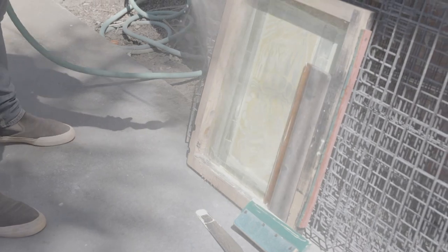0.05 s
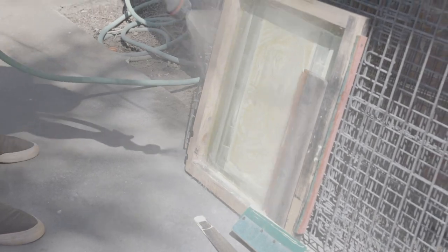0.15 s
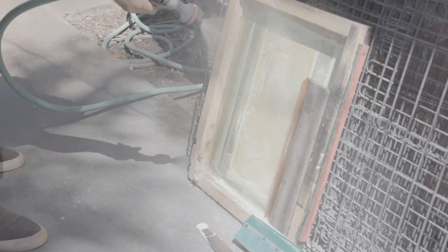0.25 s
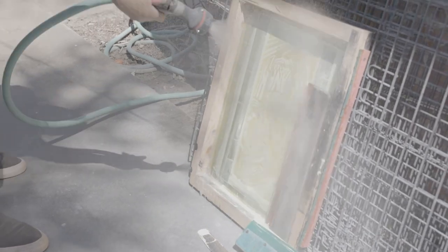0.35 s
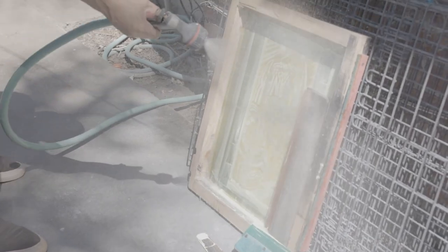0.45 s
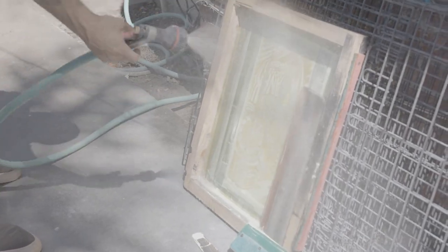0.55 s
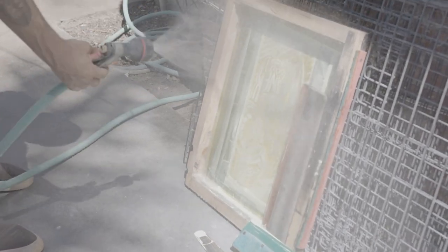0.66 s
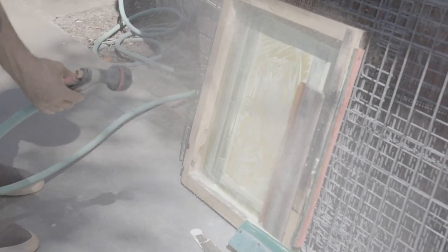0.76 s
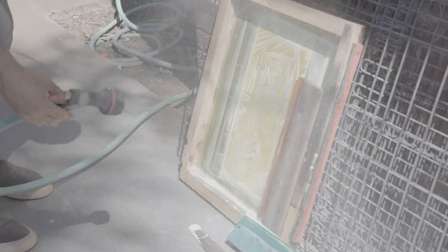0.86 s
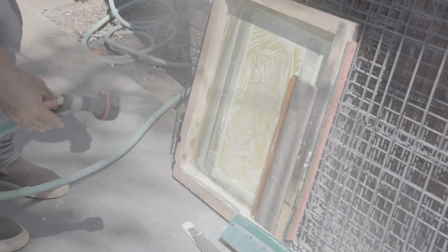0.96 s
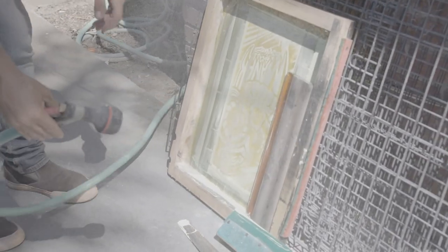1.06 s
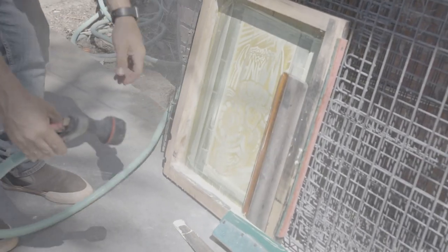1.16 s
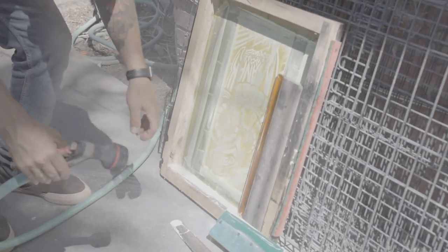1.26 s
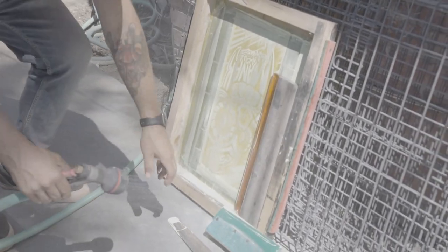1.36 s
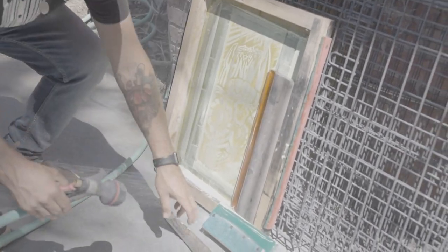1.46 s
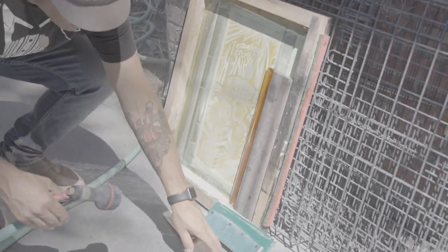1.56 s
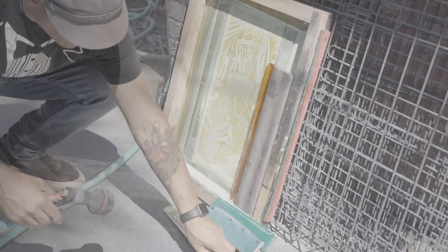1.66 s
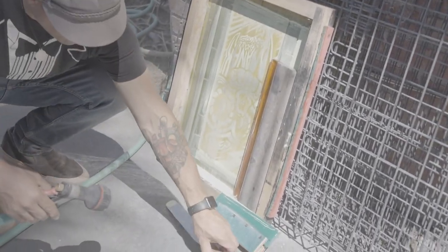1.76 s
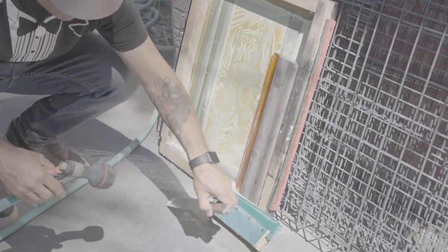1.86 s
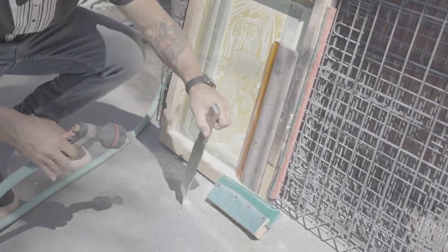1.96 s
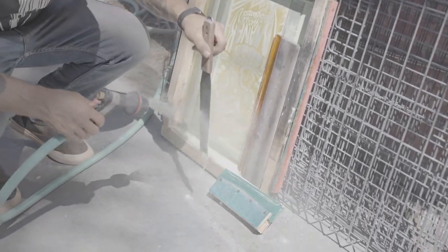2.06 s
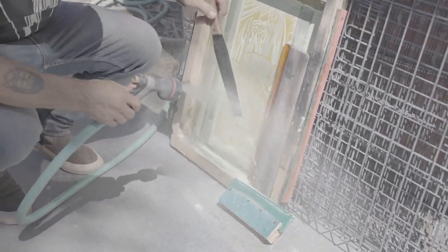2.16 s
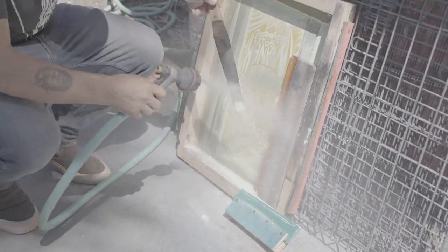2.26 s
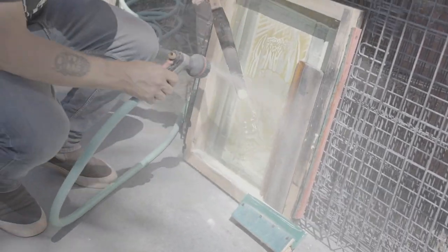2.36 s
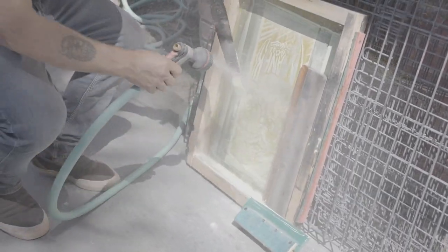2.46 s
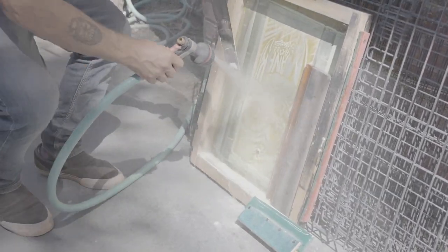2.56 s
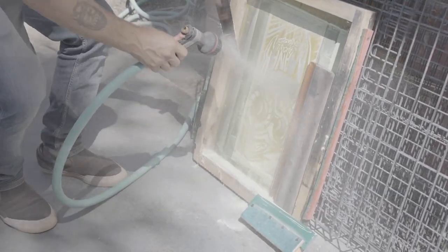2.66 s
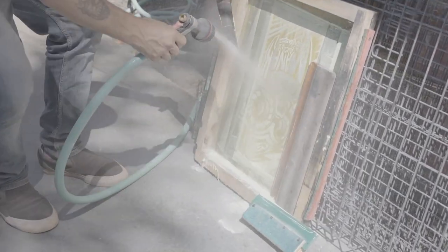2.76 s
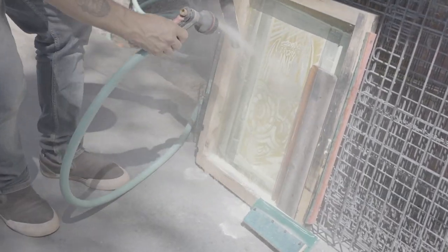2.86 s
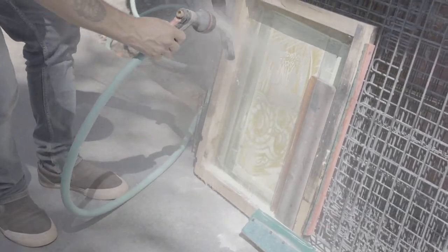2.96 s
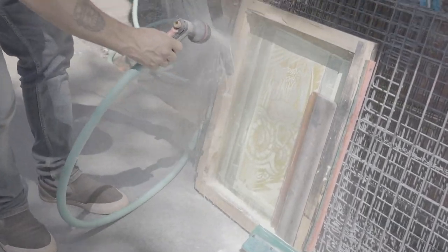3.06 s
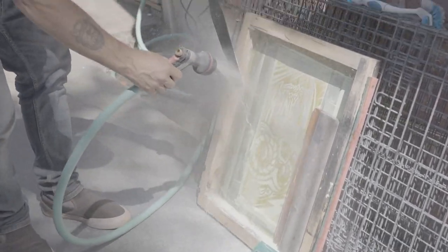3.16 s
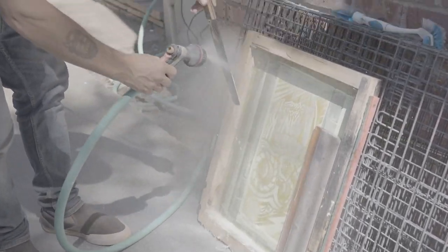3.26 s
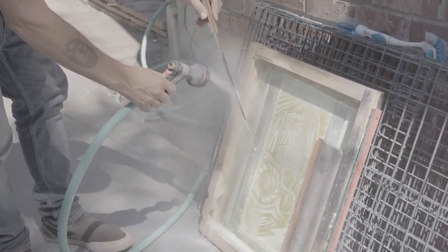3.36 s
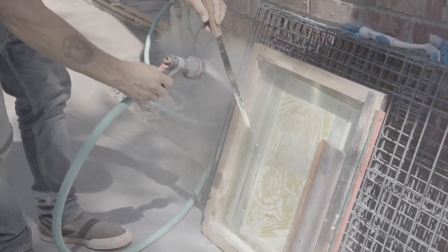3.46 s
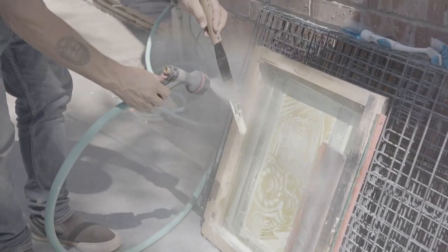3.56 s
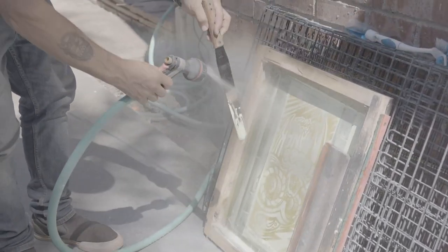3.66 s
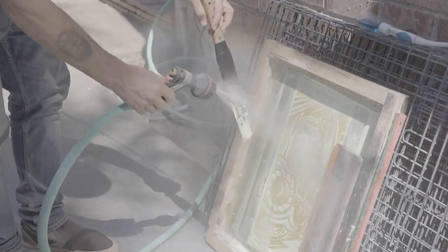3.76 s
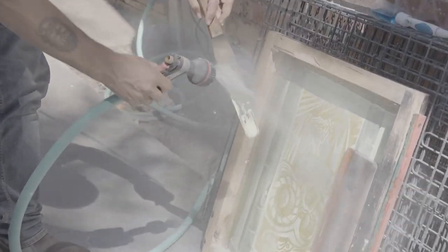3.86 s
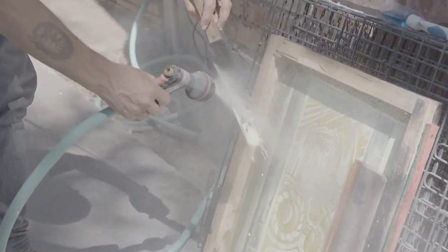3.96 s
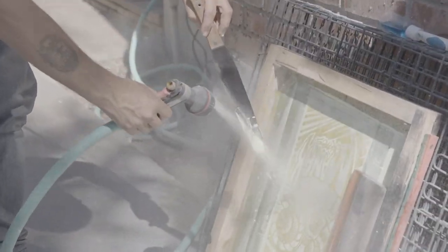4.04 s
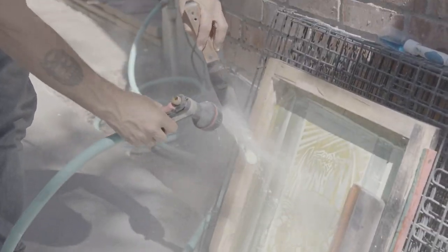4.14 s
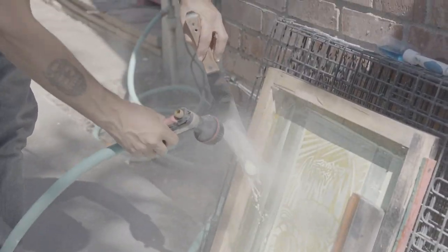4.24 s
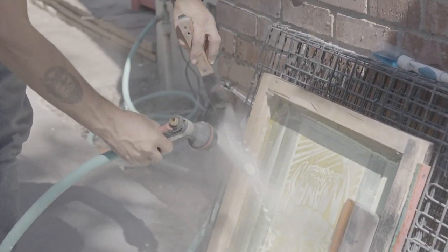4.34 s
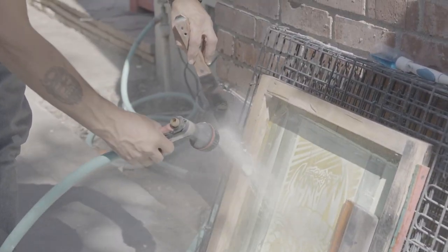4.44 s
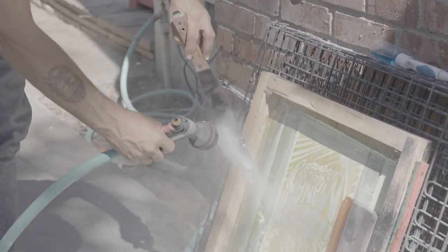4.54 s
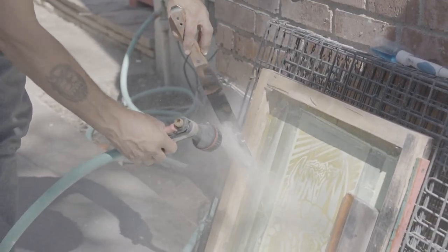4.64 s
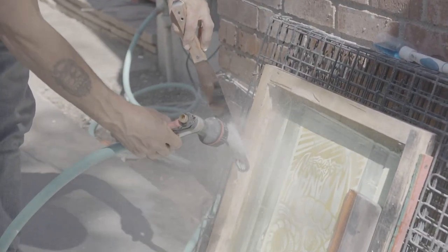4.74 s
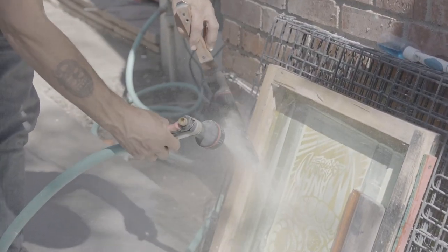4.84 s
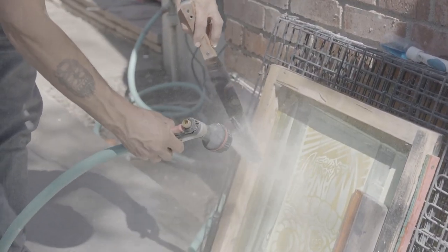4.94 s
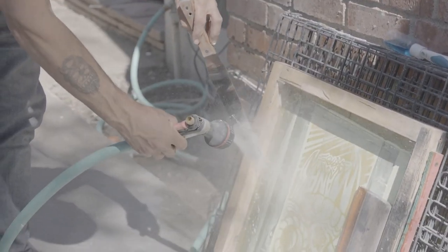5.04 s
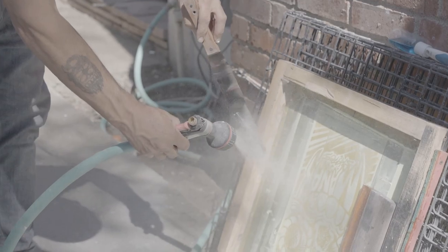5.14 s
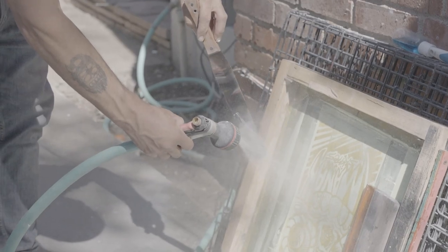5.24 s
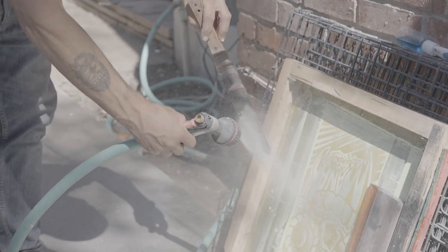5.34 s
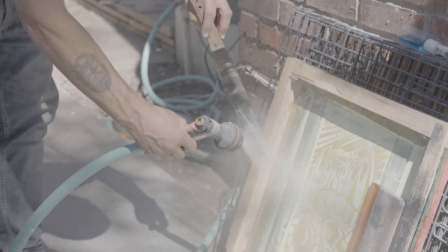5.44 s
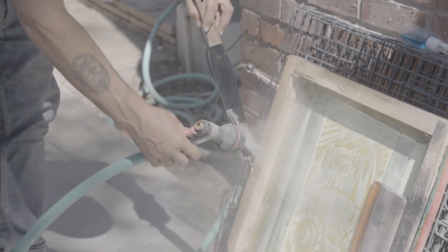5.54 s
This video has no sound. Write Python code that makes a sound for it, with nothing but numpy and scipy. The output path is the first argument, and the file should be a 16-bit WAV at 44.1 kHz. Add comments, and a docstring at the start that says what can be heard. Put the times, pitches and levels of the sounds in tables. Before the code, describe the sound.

Close outdoor stereo sound of a hose jet hissing, splashing and drumming on a taut framed screen. It cuts off sharply; in the quiet pause shoes scuff concrete, the shut valve whistles faintly and very high, and a steel scraper rasps and rings as it is picked up. The spray then returns abruptly, passes over the blade and continues in uneven surges to the end.

```python
"""A garden hose sprays a framed mesh screen in a yard: the jet hisses, splashes, and its drops drum on the taut mesh.
The spray layers are random showers of impacts, coloured as mist and splash or rung through mesh and frame modes.
The trigger is let go for 1.2 s: shoes scuff, the shut valve whistles thinly (wandering sine lines and narrow
noise), and a steel scraper rasps and rings as it is picked off the concrete. Then the spray runs on, over the
scraper's blade and the screen. Shaped noise makes the faint yard air and the runoff."""
import sys
import numpy as np
from scipy import signal
from scipy.fft import rfft, irfft, next_fast_len
from scipy.io import wavfile
from scipy.ndimage import map_coordinates

SR = 44100
rng = np.random.default_rng(int(sys.argv[2]) if len(sys.argv) > 2 else 0)


def waveform_to_disk(signal):
    """Save audio, clipped to [-1, 1], as 16-bit WAV at the path in sys.argv[1]."""
    frames = np.transpose(np.atleast_2d(signal))
    scaled = np.clip(frames, -1, 1) * 32767
    samples = np.round(scaled).astype(np.int16)
    wavfile.write(sys.argv[1], SR, samples)


N = 246959  # samples, 5.6 s

# Spectra of the fine mist and of the larger splashing drops: (f/Hz, relative level/dB per Hz)
MIST_SPECTRUM = [(900, -36.5), (2200, -9.5), (3300, -6), (4200, -2), (5600, 0.5), (7000, 0), (9000, 0.2),
                 (10600, -3), (13200, -0.5), (15800, -3.5)]
SPLASH_SPECTRUM = [(600, -35.5), (1000, -7), (1300, -5), (1700, -2), (2000, -0.5), (2400, -1), (3000, -3),
                   (3700, -5.5), (6000, -35)]
# Resonances of the wet screen, low and high, and of its wooden frame: (f/Hz, width/Hz, relative level/dB)
MESH_LOW_MODES = [(237, 33, 0), (324, 60, -3.5), (430, 77, -3.5)]
MESH_HIGH_MODES = [(457, 37, -10.5), (633, 76, -1), (777, 80, -.5), (892.5, 42, 0), (1147, 81, -7)]
FRAME_MODES = [(112, 17, 7), (137, 61, -12)]
# Slow change of the jet's force on the screen as the hand moves: (t/s, level/dB)
REACH_CURVE = [(0, 0.96), (0.85, 0.5), (2.1, -0.5), (2.3, 0.73), (3.6, 0.55), (4.5, -0.63), (4.9, -1.5),
               (5.6, 0)]
# The jet sweeps squarely over the taut mesh, or slips off it: (middle t/s, length/s, force level/dB)
SWEEP_ROWS = [(0.16, 0.077, 5.5), (0.314, 0.101, 2), (0.455, 0.079, 3), (0.641, 0.056, 2),
              (2.683, 0.127, 3), (2.835, 0.045, 4), (3.08, 0.026, 6), (3.259, 0.081, 3.5),
              (3.538, 0.19, 5.8), (3.759, 0.12, 6), (4.158, 0.079, 9.5), (4.308, 0.127, 5),
              (4.672, 0.034, 8), (4.802, 0.075, 11), (5.039, 0.07, 7.0), (5.302, 0.24, 4.5),
              (5.568, 0.072, 7)]
SLIP_ROWS = [(0.381, 0.03, -4.5), (0.553, 0.07, -2), (3.156, 0.054, -5.1), (3.361, 0.047, -4.5),
             (4.079, 0.043, -2.5), (4.202, 0.037, -4), (4.466, 0.12, -2.5), (4.624, 0.054, -3),
             (4.873, 0.069, -4.0)]
# How each layer answers the jet: (base level/dB, share of a sweep's dB, share of a slip's dB)
MIST_RESPONSE = (-18.5, 0.23, 0.73)
SPLASH_RESPONSE = (-25, 0.38, 1.12)
DRUM_RESPONSE = (-34.5, 1.0, 1.0)
SWAY_RESPONSE = (-39.5, 0.7, 0.8)
# The scraper's blade crosses the jet and shields the screen: (start t/s, end t/s, splash level/dB)
BLADE_SHIELD = (2.14, 2.32, -4)
BOOM_DB, BOOM_DB_PER_S = -62.5, 1  # the frame's boom grows as the nozzle comes closer


def spray():
    """Fine mist hisses, larger drops splash, and the heaviest drum on the mesh and shake its frame."""
    flow, fan, leak = trigger()
    reach_db, = curves(REACH_CURVE)
    sweep_db, slip_db = swells(SWEEP_ROWS), swells(SLIP_ROWS)

    def layer_gain(response):
        """The jet's force, as one layer answers it."""
        base_db, sweep_share, slip_share = response
        return amp(base_db + reach_db + sweep_share * sweep_db + slip_share * slip_db)

    shield_start, shield_end, shield_db = BLADE_SHIELD
    shield_gain = amp(shield_db * gate(shield_start, shield_end, fade=.035))
    boom_gain = amp(BOOM_DB + BOOM_DB_PER_S * clock())

    mist_drops = patchy(drops(40000, spread_db=2), depth_db=1.2, width_hz=250, life=.2)
    mist = coloured(mist_drops, MIST_SPECTRUM)
    splash_drops = patchy(drops(12000, spread_db=2.5), depth_db=2.34, width_hz=110.6, life=0.2177)
    splash = coloured(walls(splash_drops), SPLASH_SPECTRUM)
    drum = resonate(drops(4000, spread_db=3), MESH_HIGH_MODES)
    sway = resonate(drops(2500, spread_db=2.5), MESH_LOW_MODES)
    boom = resonate(drops(2500, spread_db=3.0), FRAME_MODES)

    flutter = wobble(45)  # the jet breaks into slugs
    treble = (fan * layer_gain(MIST_RESPONSE) + leak) * mist
    treble = treble + flow * layer_gain(SPLASH_RESPONSE) * shield_gain * splash
    bass = layer_gain(DRUM_RESPONSE) * drum + layer_gain(SWAY_RESPONSE) * sway + boom_gain * boom
    return treble * amp(.4 * flutter) + flow * bass * amp(1.06 * flutter)


# The trigger is held: (valve opens t/s, valve shuts t/s)
TRIGGER_HOLDS = [(-.5, 0.8893), (2.089, 6)]
OPEN_S, SHUT_DB_PER_S = .004, 362  # the jet arrives at once and dies away as the valve closes
FAN_DB, FAN_S = -3.5, 0.085  # the mist starts this much weaker; time constant of its fanning out
LEAK_DB, LEAK_DB_PER_S = -34, 400  # hiss as the valve cracks open, and how fast it builds


def trigger():
    """Gains of the jet's flow, of its mist as it fans out, and of the leak just before it starts."""
    t = clock()
    flow, fan, leak = np.zeros((3, N))
    for opens, shuts in TRIGGER_HOLDS:
        attack = np.clip(1 + (t - opens) / OPEN_S, 0, 1)
        held = attack * amp(-SHUT_DB_PER_S * np.maximum(t - shuts, 0))
        flow += held
        fan += held * amp(FAN_DB * np.exp(-np.maximum(t - opens, 0) / FAN_S))
        leak += (t < opens) * amp(LEAK_DB - LEAK_DB_PER_S * np.abs(opens - t))
    return flow, fan, leak


def swells(rows):
    """Sum of rounded, flat-topped bumps in dB; each length is the width at half the bump's dB."""
    t = clock()
    return sum(db / (1 + (2 * (t - middle) / length) ** 4) for middle, length, db in rows)


# Early echoes from the ground and brick walls: (delay t/s, level/dB)
WALL_ECHOES = [(.0031, -21.5), (0.011, -14.5), (0.0197, -17), (0.025, -18)]


def walls(x):
    """Early echoes comb the sound; their paths drift as the hand moves."""
    t = clock()
    out = x.copy()
    for delay, db in WALL_ECHOES:
        heard = t - delay - .00005 * wobble(1.5)
        out += amp(db) * np.array([np.interp(heard, t, channel) for channel in x])
    return out


# The jet dwells on a spot and makes it ring: (start t/s, end t/s, f/Hz, width of each filter pass/Hz, level/dB)
RINGING_SPOTS = [(0.384, .85, 1125, 40, -34), (.42, .85, 1295, 110, -36), (0.299, 0.8, 2230, 200, -33.5),
                 (.78, 0.912, 1810, 350, -28), (2.05, 2.283, 1473, 230, -28), (2.14, 2.343, 2720, 400, -25),
                 (2.17, 2.33, 3850, 400, -30), (2.25, 2.657, 1490, 220, -31.5),
                 (2.16, 2.27, 236, 60, -34.5), (2.38, 2.9, 1920, 160, -33),
                 (2.498, 2.951, 3050, 240, -34.5), (4.329, 4.76, 6060, 59.9, -33),
                 (4.72, 5.049, 6130, 80, -36), (5.1, 5.7, 1540, 160, -32), (4.45, 5.7, 1910, 320, -36.5),
                 (4.95, 5.697, 2940, 260, -33)]


def spots():
    """Frame, mesh and blade ring in narrow bands of noise that swell and fade as the jet dwells on them."""
    out = np.zeros((2, N))
    for start, end, hz, width, db in RINGING_SPOTS:
        across = np.clip((clock() - start) / (end - start), 0, 1)
        arch = 2 * np.sqrt(across * (1 - across))
        band = signal.iirpeak(hz, hz / width, fs=SR)
        once = signal.lfilter(*band, rng.standard_normal((2, N)))
        ring = signal.lfilter(*band, once)
        out += amp(db) * arch * unit(ring)
    flow, _, _ = trigger()
    return out * flow


# Spectrum of grit crushed on concrete: (f/Hz, relative level/dB per Hz); it also colours the yard's runoff
GRIT_SPECTRUM = [(900, -33), (1900, 1), (3200, -7), (5500, 0.5), (8500, 0), (11000, -3.5), (15000, -5)]
# The blade pressed on the ground: (f/Hz, width/Hz, relative level/dB)
RASP_MODES = [(1860, 300, -1), (5300, 450, 1), (6100, 200, 1), (7950, 500, 1), (8750, 700, -1)]
# The scraper is dragged off the ground: (loudest t/s, pressure level/dB, rise/dB per s, fall/dB per s)
DRAG_STROKES = [(1.9, -43, 430, 260), (1.934, -48.5, 900, 200)]
# Its edge catches: (t/s, level/dB)
EDGE_CATCHES = [(1.898, -44), (1.931, -36), (1.936, -37)]
# The free blade: (f/Hz, level/dB, t60/s)
BLADE_MODES = [(3560, -66, .3), (4727, -50, .3), (12370, -54, .2), (13660, -67, .17)]


def scraper():
    """The steel edge rasps over concrete, catches, and rings on after the last catch as it lifts."""
    grit = coloured(drops(3000, spread_db=1), GRIT_SPECTRUM)
    steel = resonate(drops(3000, spread_db=4), RASP_MODES)
    t = clock()
    strokes = [amp(db - np.maximum(rise * (s - t), fall * (t - s))) for s, db, rise, fall in DRAG_STROKES]
    pressure = np.max(strokes, axis=0)
    out = pressure * (amp(-2) * grit + amp(-4) * steel)
    crack = coloured(rng.standard_normal((2, N)), GRIT_SPECTRUM)
    for s, db in EDGE_CATCHES:
        age = np.maximum(t - s, 0)
        out += amp(db) * (age > 0) * amp(-60 * age / .016) * crack
    free = np.maximum(t - EDGE_CATCHES[-1][0], 0)
    for hz, db, t60 in BLADE_MODES:
        out[0] += amp(db - 60 * free / t60) * np.sin(2 * np.pi * hz * free)
    return out


# A rubber sole on wet concrete: (f/Hz, relative level/dB per Hz)
SOLE_SPECTRUM = [(100, -10), (300, 5), (600, -6), (1000, -6), (2400, -4), (4000, -18), (8000, -11),
                 (14000, -32)]
# Shoes and grit on the concrete: (t/s, level/dB, time to fall 40 dB/s, centre f/Hz)
SCUFF_EVENTS = [(1.125, -44, .04, 1500), (1.134, -45, 0.04, 1550), (1.2455, -36.5, .012, 1700),
                (1.317, -51.5, .025, 7250), (1.766, -47.5, 0.015, 5000), (1.807, -55, .04, 6500)]


def scuffs():
    """Shoes scuff and grit ticks as decaying bursts, each with a faint, slower tail from the brick wall."""
    out = np.zeros((2, N))
    sole = coloured(drops(6000, spread_db=0), SOLE_SPECTRUM)
    sand = drops(12000, spread_db=3)
    for s, db, length, hz in SCUFF_EVENTS:
        age = np.maximum(clock() - s, 0)
        contact = amp(-40 * age / length)
        tail = amp(-15 - 60 * age / .2)
        grit = unit(signal.lfilter(*signal.iirpeak(hz, 2.2, fs=SR), sand))
        weight = np.clip(1300 / hz, 0, 1) ** 2  # dull contacts carry the weight of the foot
        out += amp(db) * (age > 0) * (contact + tail) * (weight * sole + (1 - weight) * grit)
    return out


# The shut valve's glide: (t/s, pitch f/Hz, relative level/dB)
WHISTLE_GLIDE = [(1.08, 10200, -74), (1.18, 11400, -66), (1.24, 12900, -58), (1.29, 13250, -58),
                 (1.335, 12600, -56), (1.41, 12900, -54), (1.51, 12550, -56), (1.57, 11700, -59.5),
                 (1.63, 10400, -76)]
# Its separate lines: (pitch ratio, relative level/dB)
WHISTLE_PARTIALS = [(.82, -14), (.875, -12), (.955, -4), (1, -1), (1.035, -7), (1.09, -10)]


def valve():
    """Water squeezes past the shut valve in thin, airy whistles that wander apart."""
    pitch_hz, db = curves(WHISTLE_GLIDE)
    whistles = np.zeros((2, N))
    for ratio, line_db in WHISTLE_PARTIALS:
        line_hz = ratio * pitch_hz * (1 + .012 * wobble(26))
        phase = 2 * np.pi * np.cumsum(line_hz) / SR
        waver = np.array([wobble(300), wobble(300)])
        whistles += amp(line_db + 2 * wobble(13.7)) * waver * np.sin(phase)
    air_modes = [(4750, 200, -3), (8100, 500, -7), (12700, 1400, -2)]  # (f/Hz, width/Hz, level/dB)
    air = resonate(rng.standard_normal((2, N)), air_modes)
    audible = gate(WHISTLE_GLIDE[0][0], WHISTLE_GLIDE[-1][0], fade=.02)
    return (whistles + amp(-9) * air) * amp(db - 4) * audible


# Spectrum of the yard's air: (f/Hz, relative level/dB per Hz)
YARD_SPECTRUM = [(20, -35), (50, -13.5), (100, -9), (150, -5), (185, -8.5), (250, -5.5), (430, -16),
                 (800, -10.5), (1300, -16.5), (2000, -22), (3300, -31), (8000, -34), (15500, -45)]
RUNOFF_DB, RUNOFF_UNTIL_S, RUNOFF_DB_PER_S = -61, 1.23, 50  # water trickles off the screen, then drains away


def yard():
    """Distant town rumble as shaped noise, and a faint trickle of drops running off."""
    air = coloured(rng.standard_normal((2, N)), YARD_SPECTRUM)
    runoff = coloured(drops(2500, spread_db=0), GRIT_SPECTRUM)
    runoff_db = RUNOFF_DB - RUNOFF_DB_PER_S * np.maximum(clock() - RUNOFF_UNTIL_S, 0)
    return amp(-54.5) * air + amp(runoff_db) * runoff


# Stereo width: (f/Hz, left-right likeness from 0 to 1)
STEREO_LIKENESS = [(130, 1), (300, 1), (640, 0.93), (1400, 0.67), (3100, 0.39), (7000, .14), (15000, 0.15)]
# Stereo balance, faded out below 300 Hz: (f/Hz, left-minus-right level/dB)
STEREO_LEAN = [(380, 1.5), (700, -1), (1290, 0), (2400, -2.5), (4400, -2), (8100, -6), (15000, -5)]
HALVES = np.array([[.5], [-.5]])  # left and right each take half of a difference


def spread(pair):
    """Two unrelated signals become left and right: alike in the bass, louder and earlier on the right in the treble."""
    def turn(hz):
        return np.arccos(np.clip(along(STEREO_LIKENESS, hz), -1, 1)) / 2

    def lean(hz):
        lean_db = along(STEREO_LEAN, hz) * np.clip(hz / 300, 0, 1) ** 2
        lag_points = [(500, 0), (1600, 0.36), (3300, 1.0), (7000, 0.26), (12000, 0)]  # (f/Hz, left lag/rad)
        return amp(lean_db * HALVES) * np.exp(-1j * along(lag_points, hz) * HALVES)

    mid, side = filtered(pair, lambda hz: np.array([np.cos(turn(hz)), np.sin(turn(hz))]))
    return filtered(np.array([mid + side, mid - side]), lean)


def amp(db):
    """Decibels to gain."""
    return 10 ** (np.asarray(db) / 20)


def unit(x):
    """Scaled to rms 1."""
    return x / np.sqrt(np.mean(x ** 2) + 1e-20)


def clock():
    """The time of each sample in seconds."""
    return np.arange(N) / SR


def along(points, hz):
    """(f/Hz, value) points joined on a log frequency axis."""
    f, v = np.transpose(points)
    return np.interp(np.log(hz + 1), np.log(f + 1), v)


def curves(rows):
    """One value per sample for each column after the time."""
    s, *cols = np.transpose(rows)
    return [np.interp(clock(), s, c) for c in cols]


def gate(start, end, fade):
    """1 from start to end, with soft edges outside."""
    return np.clip(1 + np.minimum(clock() - start, end - clock()) / fade, 0, 1)


def wobble(rate):
    """A smooth random curve, rate knots a second."""
    knots = rng.standard_normal(int(N * rate / SR) + 4)
    return map_coordinates(knots, [clock() * rate])


def filtered(x, response):
    """x times a complex response of frequency."""
    size = next_fast_len(N + SR // 2)
    return irfft(rfft(x, size) * response(np.fft.rfftfreq(size, 1 / SR)), size)[..., :N]


def coloured(x, spectrum):
    """x with a (f/Hz, level/dB) spectrum, at rms 1."""
    return unit(filtered(x, lambda hz: amp(along(spectrum, hz))))


def resonate(x, modes):
    """x through (f/Hz, width/Hz, level/dB) resonances with dark skirts, at rms 1."""
    def response(f):
        peaks = 0
        for k, (centre, width, db) in enumerate(modes):
            sign = (-1) ** k  # neighbours have opposite polarity
            peaks = peaks + sign * amp(db) * 1j * f * width / (centre ** 2 - f ** 2 + 1j * f * width)
        upper_skirt = 1 + (f / (1.68 * modes[-1][0])) ** 4
        lower_skirt = 1 + (0.68 * modes[0][0] / (f + 1)) ** 6
        return peaks / upper_skirt / lower_skirt
    return unit(filtered(x, response))


def drops(rate, spread_db):
    """Two unrelated showers of impacts of random size, rate a second."""
    hits = rng.poisson(rate / SR, (2, N))
    polarity = rng.choice([-1, 1], (2, N))
    size = amp(spread_db * rng.standard_normal((2, N)))
    return unit(np.sqrt(hits) * polarity * size)


def patchy(x, depth_db, width_hz, life):
    """Colour that shifts at random as the jet wanders over wet surfaces: patches width_hz wide, life seconds long."""
    hz, t, z = signal.stft(x, SR, nperseg=1024)
    places = np.meshgrid(hz / width_hz, t / life, indexing="ij")
    field = map_coordinates(rng.standard_normal((256, 256)), places, order=1, mode="mirror")
    return signal.istft(z * amp(depth_db * unit(field)), nperseg=1024)[1][:, :N]


# The spray drifts leftwards: (t/s, left-minus-right level/dB)
SPRAY_DRIFT = [(0, -0.5), (2.3, -0.5), (3.2, -0.5), (4.2, 0.2), (5, 1.5)]


def scene():
    """The spray and the small sounds of the pause; only the treble of the mix follows the moving jet sideways."""
    drift_db, = curves(SPRAY_DRIFT)
    pair = spread(spray() + spots() + scraper() + scuffs() + valve() + yard())
    bass = filtered(pair, lambda hz: 1 / (1 + (hz / 700) ** 4))
    return bass + (pair - bass) * amp(drift_db * HALVES)


TOP_HZ = 16000


def record(dry):
    """A steep band limit leaves nothing above TOP_HZ."""
    return filtered(dry, lambda hz: np.clip((TOP_HZ - hz) / 200, 0, 1) ** 2)


dry = scene()
out = record(dry)
waveform_to_disk(out)
```